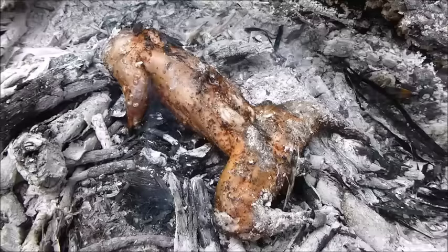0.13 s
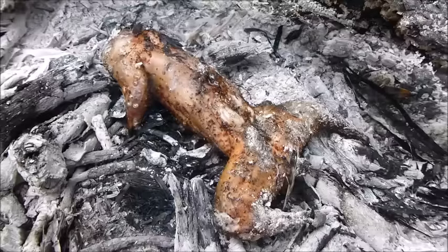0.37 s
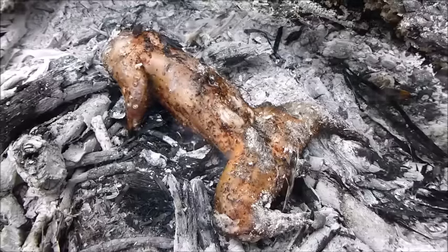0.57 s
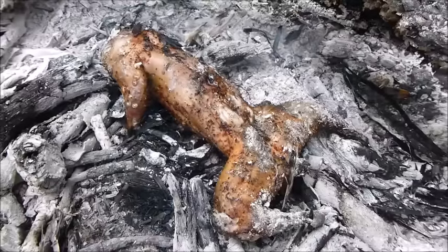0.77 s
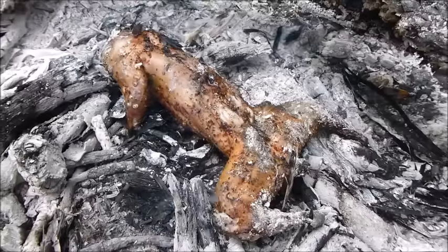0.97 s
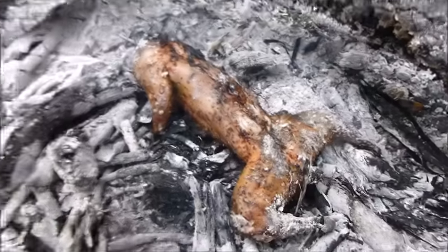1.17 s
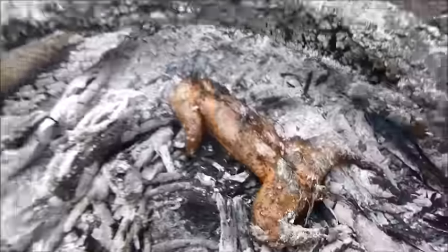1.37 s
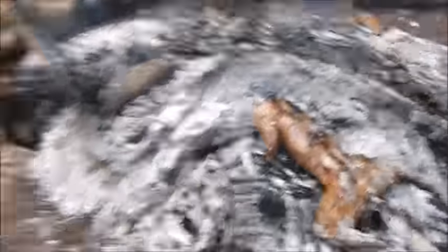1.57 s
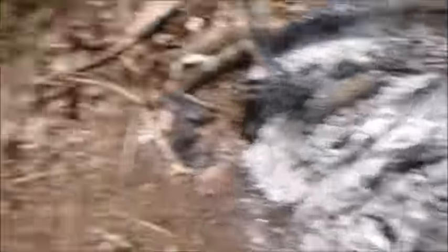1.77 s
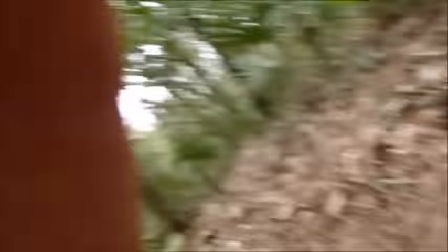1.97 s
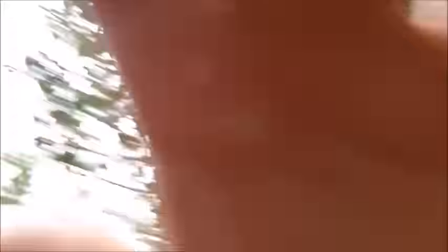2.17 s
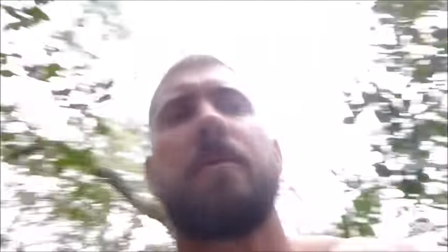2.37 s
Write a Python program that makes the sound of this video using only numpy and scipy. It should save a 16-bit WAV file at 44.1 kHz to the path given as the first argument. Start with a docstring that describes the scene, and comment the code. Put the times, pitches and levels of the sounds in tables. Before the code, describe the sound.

Close, quiet sizzling of meat on ash outdoors, fine and bright with a few faint pops, after a brief silence; near the end the sizzle dips under handling rustle, one hard knock and a tiny click.

```python
"""Outdoors, meat sizzles on hot ash: random fat bursts come in spurts, fine bubbles fizz as narrow-band
grains, and juice sputters as short low rings, over shaped noise for the open air and a thin hiss.
The sizzle wavers and dips as a hand-held phone moves. Dry ticks are short filtered noise; fingers rub
the case as dense grains and swelling brushes. One knock, stronger on the left, and a small sharp click
ring damped modes."""
import sys
import numpy as np
from scipy import signal
from scipy.fft import rfft, irfft
from scipy.io import wavfile

SR = 44100
rng = np.random.default_rng(int(sys.argv[2]) if len(sys.argv) > 2 else 0)


def persist_wave(psi):
    """Save psi, clipped to +-1, as 16-bit WAV."""
    counts = np.round(np.clip(psi, -1, 1) * 32767).astype(np.int16)
    wavfile.write(sys.argv[1], SR, np.atleast_2d(counts).T)


N = 107118


def undb(db):
    """Level law: decibels to amplitude gain."""
    return 10 ** (np.asarray(db) / 20)


def unit(x):
    """Power normalisation: scale to rms 1."""
    return x / np.sqrt(np.mean(x ** 2) + 1e-20)


def clock():
    """Sampling: the time of every sample in seconds."""
    return np.arange(N) / SR


def curve(points):
    """Envelope: gain interpolated in decibels along (time_s, level_db) points."""
    times, levels = np.array(points).T
    return undb(np.interp(clock(), times, levels))


def pan(db):
    """Level-difference panning at constant power; positive dB favours the left."""
    db = np.atleast_1d(db)
    gains = undb(np.array([db, -db]) / 2)
    return gains / np.sqrt(np.mean(gains ** 2, axis=0))


def walk(hz):
    """Random modulation: lines joining hz Gaussian values per second, rms 1."""
    values = rng.standard_normal(4096)
    return unit(np.interp(clock() * hz, np.arange(4096), values))


def log_bins():
    """Logarithmic pitch: octave position of every spectrum bin."""
    return np.log2(np.maximum(np.arange(N // 2 + 1) * SR / N, 1))


def colour(x, points):
    """Spectral shaping: filter along (frequency_hz, level_db) points, then set rms 1."""
    hz, db = np.array(points).T
    gain = undb(np.interp(log_bins(), np.log2(hz), db))
    return unit(irfft(rfft(x) * gain, N))


def band(x, hz, octaves):
    """Band-pass filtering: one zero-phase peak with steep skirts, rms 1."""
    offset = (log_bins() - np.log2(hz)) / octaves
    return unit(irfft(rfft(x) / (1 + .5 * offset ** 2) ** 2, N))


def noise(width):
    """Mid-side stereo noise; width is the ratio of side to mid."""
    mid, side = rng.standard_normal((2, N))
    return np.array([mid + width * side, mid - width * side])


def grains(per_s, spread_db, pan_db):
    """Shot noise: random impulses, each with its own size, sign and direction."""
    size, place, sign = rng.standard_normal((3, N))
    fires = rng.random(N) < per_s / SR
    gain = undb(spread_db * np.minimum(size, 2.7))  # limits the rare giants
    return fires * np.sign(sign) * gain * pan(pan_db * place)


def decay(start, t60):
    """Exponential damping: sudden start, then a 60 dB fall in t60 seconds."""
    age = clock() - start
    return (age >= 0) * np.exp(-np.log(1000) * np.maximum(age, 0) / t60)


BURSTS_PER_S, BURST_SPREAD_DB, BURST_PAN_DB = 7500, 6.5, 5.5
SPURT_HZ, SPURT_DB = 220, 1.67
# Burst level as the phone moves: time_s, level_db
SIZZLE_LEVEL = [(.22, -50.5), (.4, -50.5), (.66, -50), (.85, -50), (1.08, -50.5), (1.18, -48), (1.38, -51),
                (1.55, -51), (1.75, -57.5), (1.9, -54), (2.1, -52), (2.26, -70), (2.42, -48.5)]
# Relative burst spectrum: frequency_hz, level_db
SIZZLE = [(300, -25), (900, -6), (2000, -3), (2800, -0.5), (3500, -2), (4100, -0.5), (5800, -0.5),
          (7000, -1), (8200, 0), (9500, 0), (10800, -0.5), (13000, -4.5), (15500, -9)]


def sizzle():
    """Modulated shot noise: tiny bursts of fat and steam, bunched in quick spurts."""
    bursts = grains(BURSTS_PER_S, BURST_SPREAD_DB, BURST_PAN_DB)
    spurts = undb(SPURT_DB * walk(SPURT_HZ))
    return colour(bursts * spurts, SIZZLE) * curve(SIZZLE_LEVEL)


FIZZ_PER_S, FIZZ_SPREAD_DB, FIZZ_PAN_DB = 3200, 6.5, 6
FIZZ_SPURT_HZ, FIZZ_SPURT_DB, SURGE_HZ, SURGE_DB = 139, 3.5, 40.03, 2.3
# Finest bubbles by size: ring_hz, width_octaves, relative level_db
FIZZ = [(10770, 0.17, -2.5), (13000, 0.17, -2.5)]
# Fizz level: time_s, level_db
FIZZ_LEVEL = [(.22, -58), (.4, -52.5), (.56, -56.5), (.65, -47.5), (.73, -52), (.78, -52), (.87, -56.5),
              (.97, -54), (1.05, -54), (1.2, -52.5), (1.5, -57), (1.75, -63), (1.9, -57), (2.25, -72),
              (2.42, -59)]


def fizz():
    """Bubble resonance: the finest bubbles ring high, in quick clusters and slower surges."""
    spurts_db = FIZZ_SPURT_DB * np.minimum(walk(FIZZ_SPURT_HZ), 2)
    surges_db = SURGE_DB * walk(SURGE_HZ)
    clusters = undb(spurts_db + surges_db)
    bubbles = 0
    for hz, octaves, db in FIZZ:
        bursts = grains(FIZZ_PER_S, FIZZ_SPREAD_DB, FIZZ_PAN_DB) * clusters
        bubbles = bubbles + undb(db) * band(bursts, hz, octaves)
    return bubbles * curve(FIZZ_LEVEL)


SPUTTER_HZ, SPUTTER_T60_S, SPUTTERS_PER_S = 1262, 0.013, 450
# Level of the sputtering juice: time_s, level_db
SPUTTER_LEVEL = [(.22, -61), (.26, -51.5), (.36, -62), (.6, -68.5), (.9, -55), (1.06, -65), (1.3, -54.5),
                 (1.5, -60.5), (1.7, -64.5), (2.42, -76)]


def sputter():
    """Impulse response: each larger bubble of juice excites a brief low ring."""
    ring = decay(0, SPUTTER_T60_S) * np.sin(2 * np.pi * SPUTTER_HZ * clock())
    bubbles = grains(SPUTTERS_PER_S, spread_db=3, pan_db=12.5)
    ringing = signal.fftconvolve(bubbles, ring[None], axes=1)[:, :N]
    return band(ringing, SPUTTER_HZ, octaves=1.0) * curve(SPUTTER_LEVEL)


AIR_DB, AIR_WIDTH = -54.5, 0.75  # mean level, side-to-mid ratio
HISS_HZ, HISS_OCTAVES = 7020, 0.12
# Relative spectrum of the open air: frequency_hz, level_db
AIR = [(25, -9), (65, -9), (110, -2.5), (170, -0.5), (280, -1), (550, -3.5), (1300, -8.5), (1900, -8.5),
       (2500, -5.5), (3500, -18), (4800, -4), (8500, -14.5), (11000, -9.5), (15500, -8.5)]
# Thin hiss level as the phone turns: time_s, level_db
HISS_LEVEL = [(.22, -60.5), (1.4, -58), (1.75, -69), (2.05, -61), (2.26, -56.5), (2.42, -63)]


def background():
    """Filtered broadband noise: quiet open air, and a narrow band as a thin hiss."""
    air = colour(noise(AIR_WIDTH), AIR) * undb(AIR_DB + 0.56 * walk(8.87))
    hiss = band(noise(width=0.24), HISS_HZ, HISS_OCTAVES)
    return air + hiss * curve(HISS_LEVEL)


TICK_CRACK = 4.5  # first impulse relative to the noise of the tail
# Small pops and ticks: start_s, level_db, centre_hz, width_octaves, t60_s, pan_db
TICKS = [(.4866, -33, 11000, 1.5, .005, 1), (.499, -30, 15200, .12, .006, 0),
         (.978, -37.5, 12000, 0.53, 0.0073, 1), (1.309, -38.5, 10200, .12, .008, -4),
         (1.459, -21, 11000, 1.2, 0.0032, -1), (1.607, -31.5, 1500, 1.53, .016, -5),
         (1.6685, -40.5, 1390, .9, .018, -4), (1.8, -33, 2250, 0.48, 0.011, -16),
         (1.9075, -38, 12000, .3, .006, -11), (1.934, -34, 9000, 0.87, 0.013, -11),
         (1.9929, -32, 700, 0.83, .012, 1), (2.13, -43, 1500, 0.48, .008, 8),
         (2.3148, -41.5, 2900, .8, .01, 9)]


def ticks():
    """Transient excitation: a one-sample crack and a rapidly damped noise tail."""
    out = 0
    for start, db, hz, octaves, t60, pan_db in TICKS:
        tail = decay(start, t60)
        crack = np.arange(N) == np.argmax(tail)
        pop = band(noise(width=0.41) * tail + TICK_CRACK * crack, hz, octaves)
        energy = np.sqrt(np.mean(tail ** 2))  # a longer tail carries more energy
        out = out + pop * energy * undb(db) * pan(pan_db)
    return out


GRIP_GRAINS_PER_S, GRIP_SPREAD_DB, GRIP_PAN_DB = 9000, 3, 13
# Level of the grip sliding over the phone: time_s, level_db
GRIP_LEVEL = [(1.15, -60.5), (1.35, -50), (1.46, -47.5), (1.56, -54), (1.76, -55.5), (1.85, -49),
              (1.965, -49), (1.985, -39), (2.045, -41), (2.09, -46), (2.18, -43), (2.235, -60),
              (2.3, -60.5), (2.335, -48), (2.42, -49)]
# Relative spectrum of the sliding: frequency_hz, level_db
GRIP = [(30, -27), (90, -18), (160, -6), (260, -2), (550, -3.5), (1200, -6), (1800, -2.5), (2600, -9),
        (3600, -11), (4200, -9), (6000, -11), (10000, -13), (15500, -32)]
# Soft brushes of skin on the case: start_s, length_s, level_db, centre_hz, width_octaves, pan_db
BRUSHES = [(1.351, 0.023, -41.5, 1770, 0.17, -5), (1.35, .17, -62, 166, 0.52, -1),
           (1.39, .17, -51.5, 900, 0.31, 0), (1.447, .033, -47.5, 4900, 1.35, 3),
           (1.492, 0.042, -51, 1850, 0.1, 3), (1.574, 0.04, -49.5, 1850, 0.44, -8),
           (1.795, 0.048, -41.5, 2230, 0.3, -5.5), (1.817, 0.084, -49.5, 5540, 1.4, -20),
           (1.825, 0.38, -53.5, 1750, 0.088, 1), (1.971, .038, -39, 280, .4, 0),
           (1.974, .04, -45.5, 1760, 0.34, -1), (2.004, 0.09, -46.5, 7800, 0.95, 5),
           (1.992, .11, -48.5, 403, 0.93, 8), (2.172, .017, -41.5, 8300, .5, -3)]


def handling():
    """Friction noise: skin slides in fine uneven slips, with short brushes that swell and fade."""
    slips = grains(GRIP_GRAINS_PER_S, GRIP_SPREAD_DB, GRIP_PAN_DB)
    unevenness = undb(2.4 * walk(110))
    out = colour(slips * unevenness, GRIP) * curve(GRIP_LEVEL)
    for start, length, db, hz, octaves, pan_db in BRUSHES:
        swell = np.sin(np.pi * np.clip((clock() - start) / length, 0, 1))
        slips = grains(GRIP_GRAINS_PER_S, GRIP_SPREAD_DB, GRIP_PAN_DB)
        out = out + band(slips, hz, octaves) * swell * undb(db) * pan(pan_db)
    return out


KNOCK_S, CLICK_S = 2.1667, 2.3657  # start times
CONTACT_S = 0.00012  # build-up of the ring
CASE_LOW_HZ = 348  # the knock and click hold little below this
# Case modes under the knock: frequency_hz, level_db, t60_s, pan_db
KNOCK = [(946, -14, 0.0063, 3.5), (1290, -15.5, 0.015, 6.5), (1800, -15.5, 0.01, 5.5),
         (3150, -9.5, 0.0033, 15), (4100, -20, 0.01, 4), (4900, -11.5, 0.004, 21),
         (9000, -11.5, 0.0027, 2.5), (10940, -15, 0.0026, 16), (14000, -19, 0.0013, 13)]
# Modes of the small click: frequency_hz, level_db, t60_s, pan_db
CLICK = [(1900, -42, 0.016, 5), (4320, -26, 0.013, 4), (4860, -25, 0.01, 5), (5880, -22.5, .011, 2),
         (10830, -23, 0.0079, -4.5)]


def strike(start, modes):
    """Modal superposition: a tap rings the heavily damped modes of the case."""
    age = np.maximum(clock() - start, 0)
    rings = 0
    for k, (hz, db, t60, pan_db) in enumerate(modes):
        ring = decay(start, t60) * np.sin(2 * np.pi * hz * age)
        rings = rings + (-1) ** k * undb(db) * pan(pan_db) * ring  # alternate polarity
    contact = np.minimum(age / CONTACT_S, 1)
    low_cut = signal.butter(2, CASE_LOW_HZ, "high", fs=SR, output="sos")
    return signal.sosfilt(low_cut, rings * contact)


SIZZLE_PAN_DB = 0.8


def scene():
    """Linear superposition of the meat, the open air and the hand on the phone."""
    meat = (sizzle() + fizz()) * pan(SIZZLE_PAN_DB) + sputter()
    touches = ticks() + handling() + strike(KNOCK_S, KNOCK) + strike(CLICK_S, CLICK)
    return meat + background() + touches


START_S, TOP_HZ = .2185, 15600  # end of the silence, upper band limit
BIAS_DB, BIAS_T60_S = -50, 1.57
WIDE_HZ, WIDE_OCTAVES, WIDE_DB = 950, 0.88, 6


def record(dry):
    """Mid-side widening in the midrange, opening after silence, settling bias and low-pass filtering."""
    offset = (log_bins() - np.log2(WIDE_HZ)) / WIDE_OCTAVES
    lift = undb(WIDE_DB * np.exp(-.5 * offset ** 2))
    mid = dry.mean(axis=0)
    side = irfft(rfft(dry[0] - dry[1]) * lift, N) / 2
    opened = np.array([mid + side, mid - side]) * (clock() >= START_S)
    bias = undb(BIAS_DB) * decay(START_S, BIAS_T60_S)
    top_cut = signal.ellip(10, .2, 80, TOP_HZ, fs=SR, output="sos")
    return signal.sosfilt(top_cut, opened - bias)


dry = scene()
out = record(dry)
persist_wave(out)
```